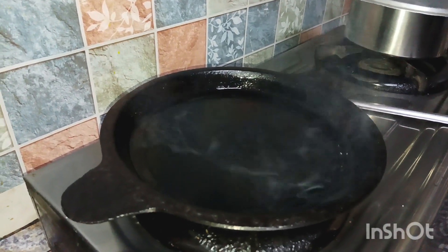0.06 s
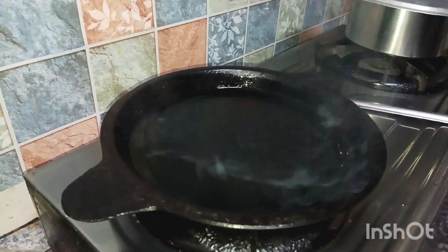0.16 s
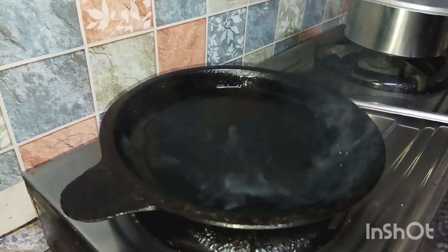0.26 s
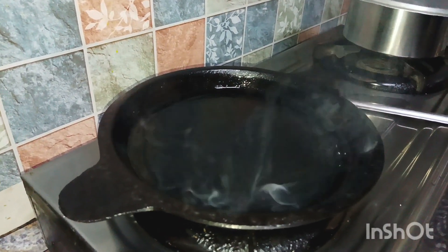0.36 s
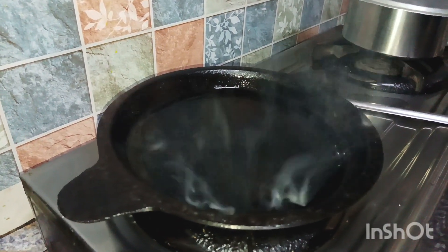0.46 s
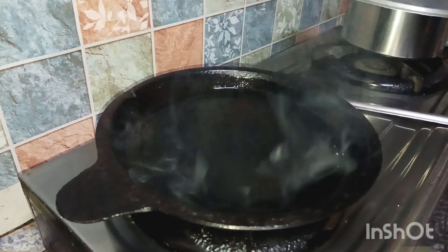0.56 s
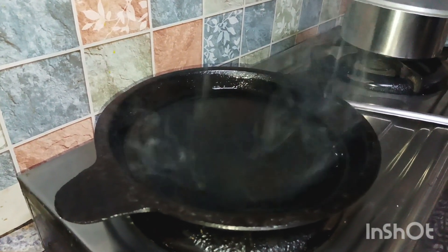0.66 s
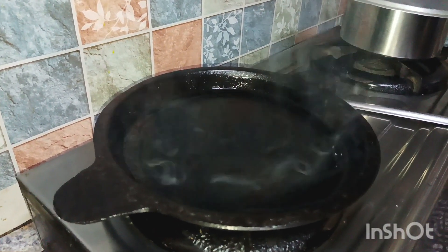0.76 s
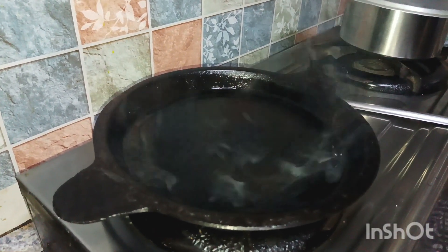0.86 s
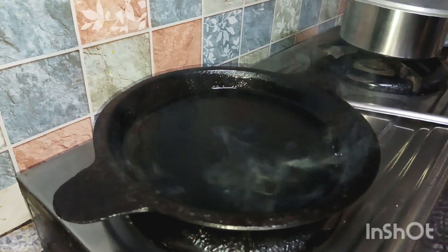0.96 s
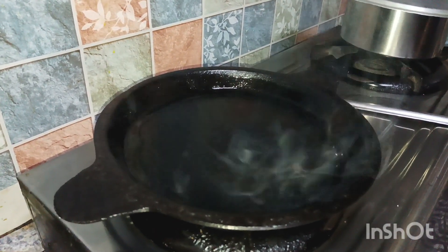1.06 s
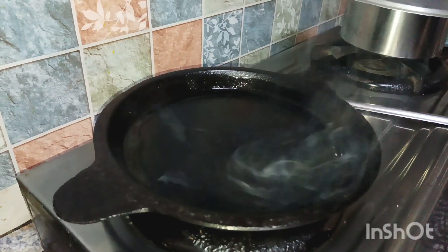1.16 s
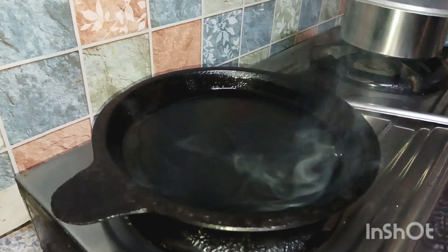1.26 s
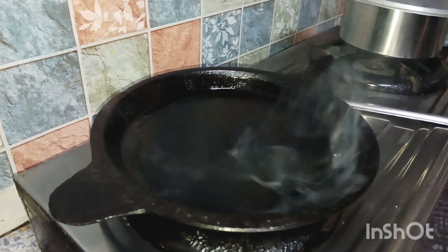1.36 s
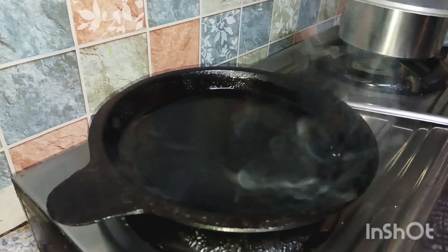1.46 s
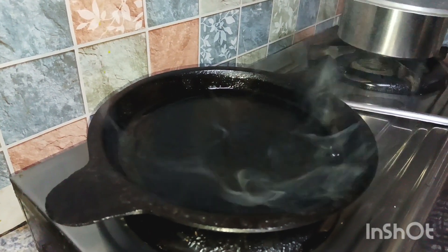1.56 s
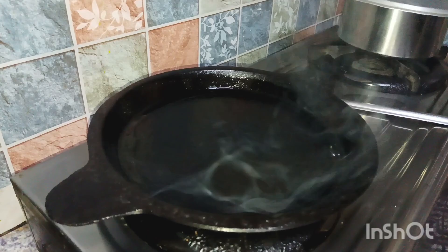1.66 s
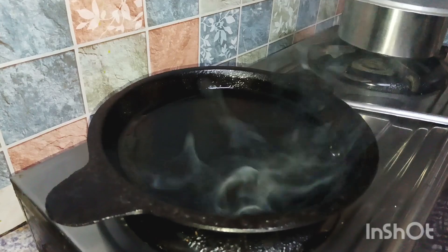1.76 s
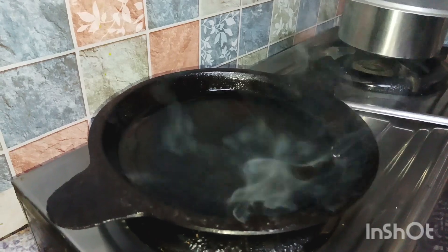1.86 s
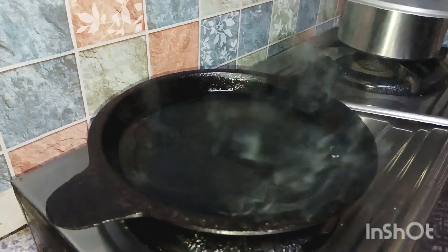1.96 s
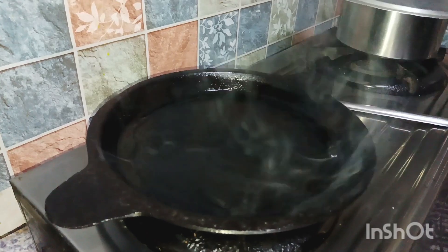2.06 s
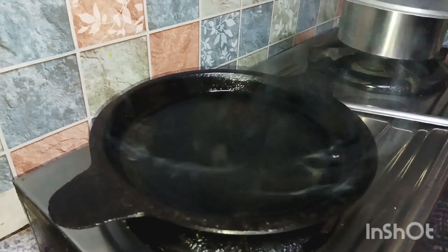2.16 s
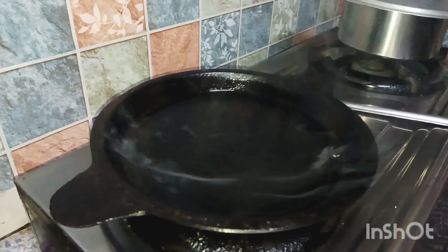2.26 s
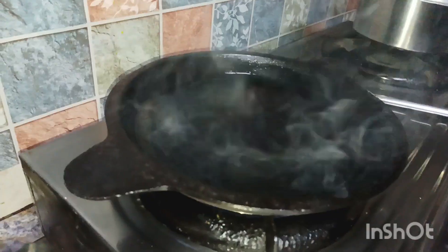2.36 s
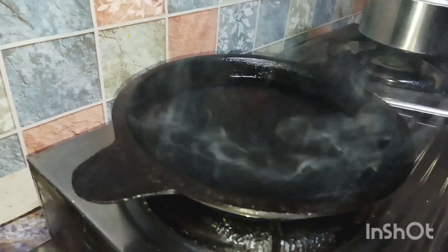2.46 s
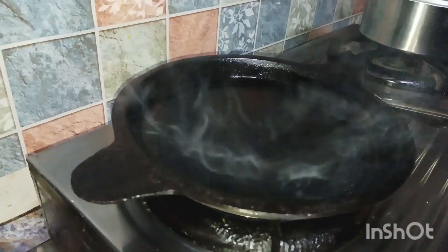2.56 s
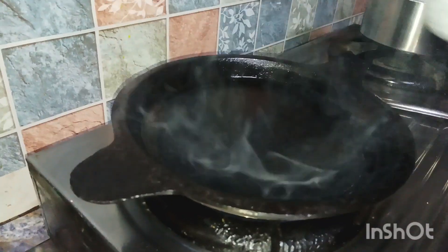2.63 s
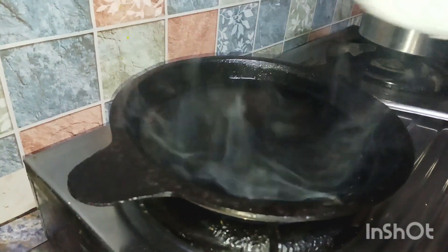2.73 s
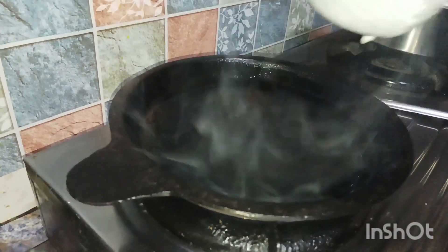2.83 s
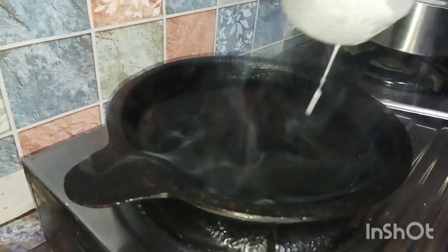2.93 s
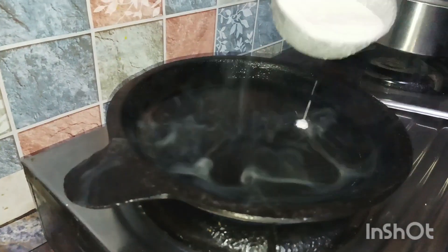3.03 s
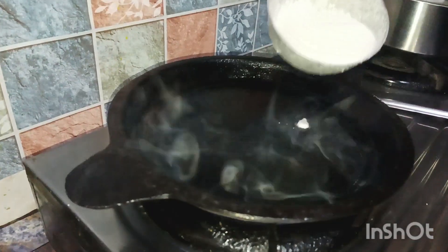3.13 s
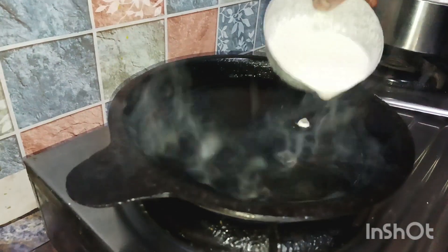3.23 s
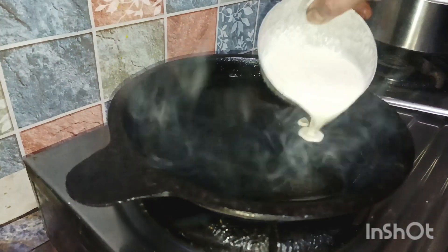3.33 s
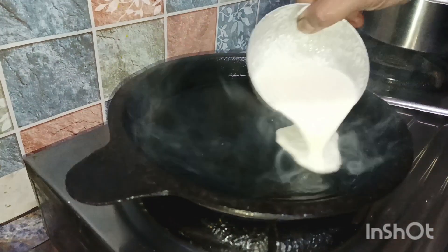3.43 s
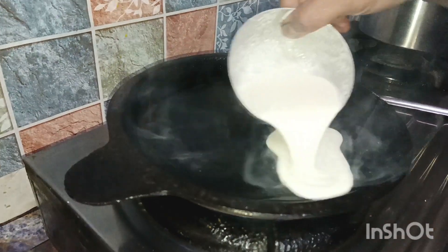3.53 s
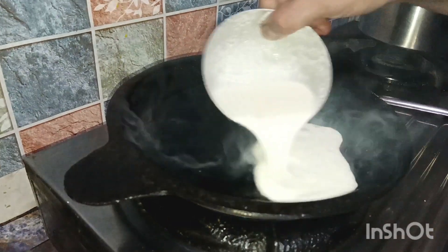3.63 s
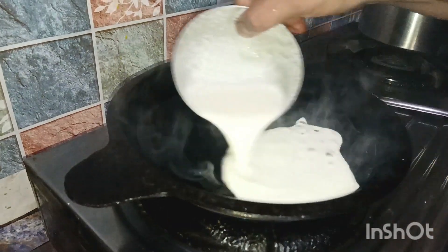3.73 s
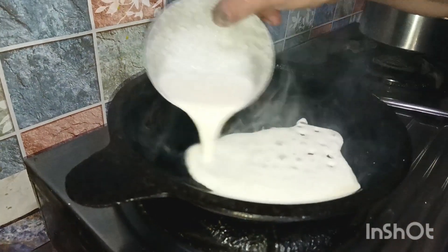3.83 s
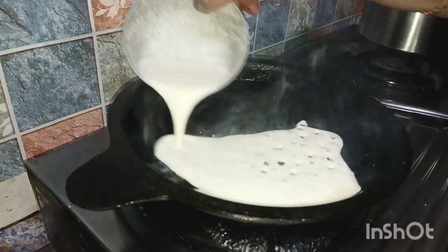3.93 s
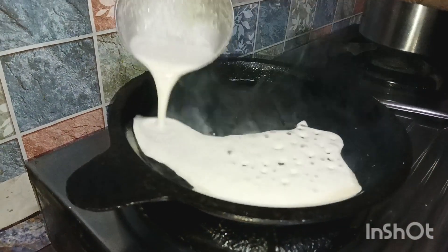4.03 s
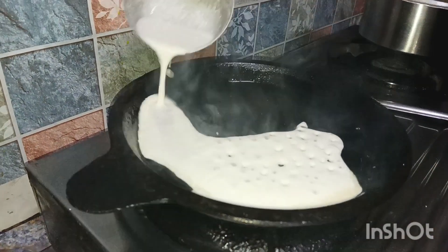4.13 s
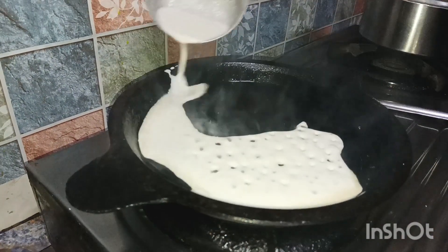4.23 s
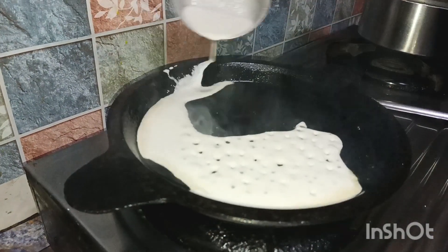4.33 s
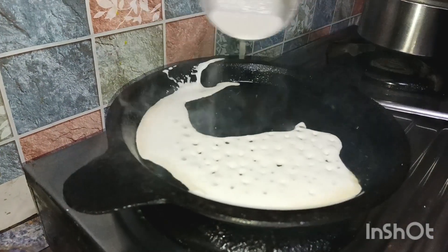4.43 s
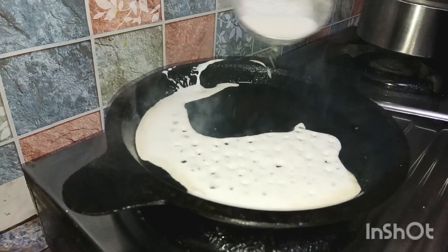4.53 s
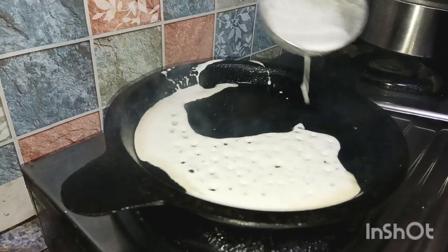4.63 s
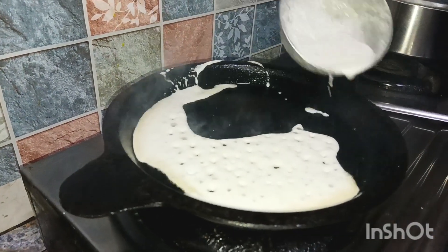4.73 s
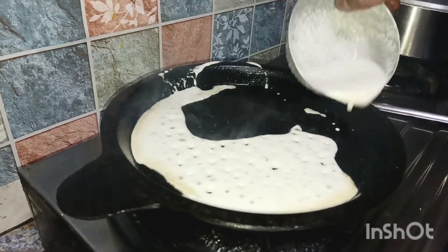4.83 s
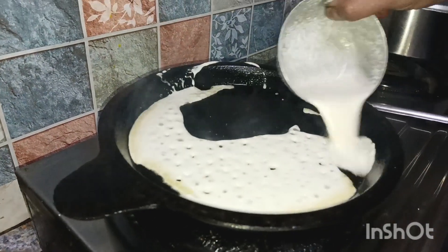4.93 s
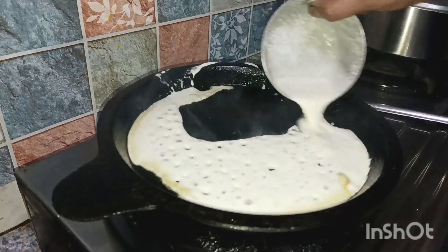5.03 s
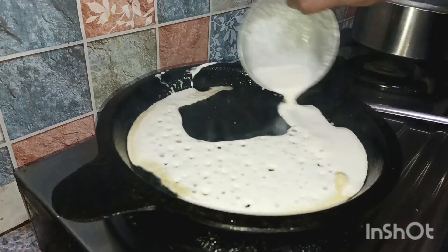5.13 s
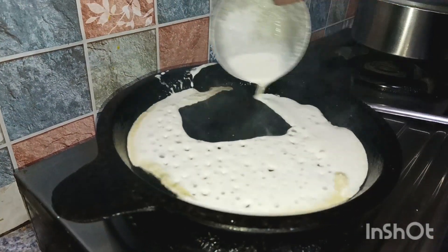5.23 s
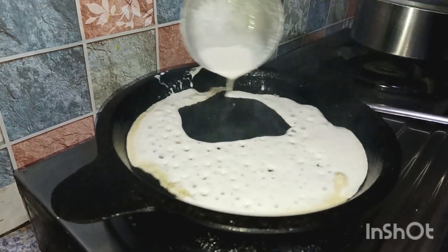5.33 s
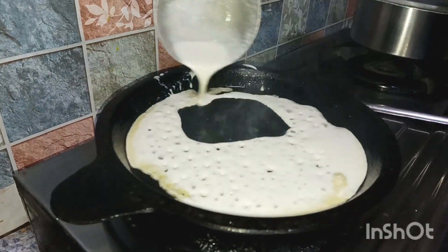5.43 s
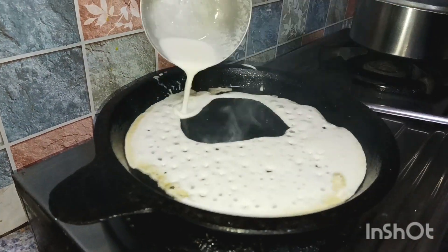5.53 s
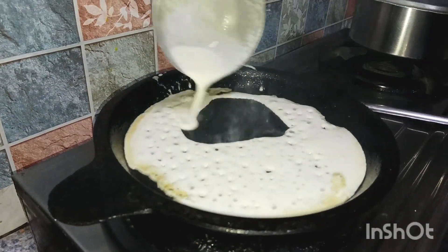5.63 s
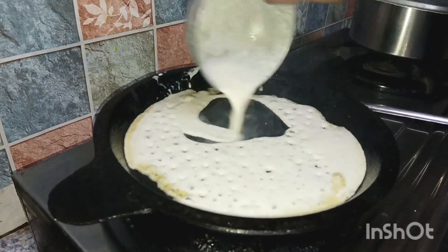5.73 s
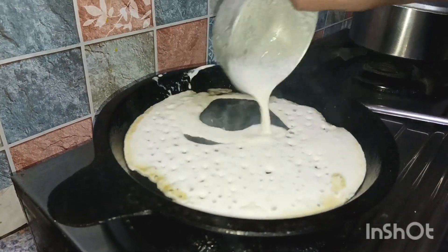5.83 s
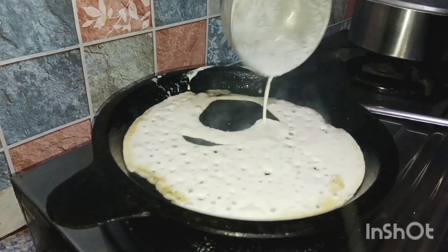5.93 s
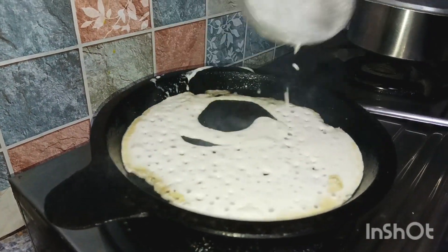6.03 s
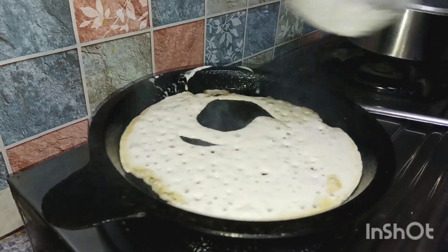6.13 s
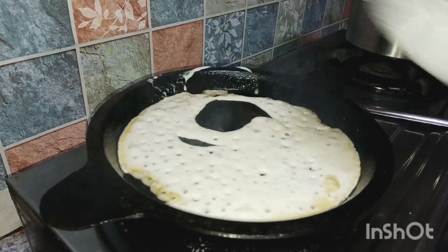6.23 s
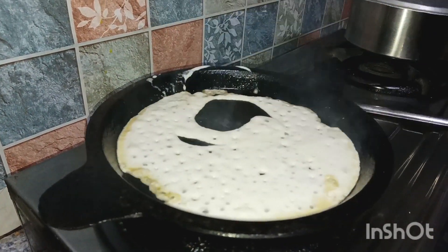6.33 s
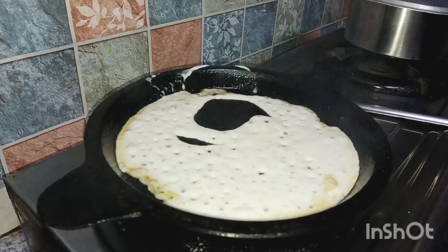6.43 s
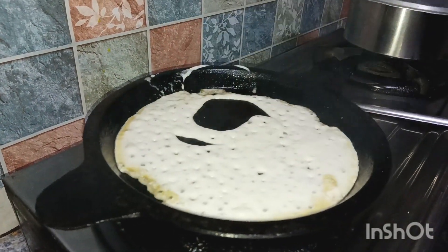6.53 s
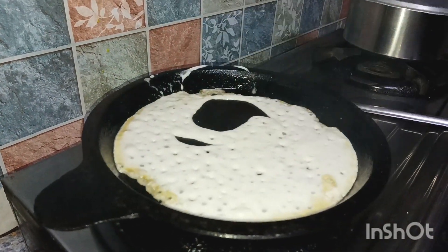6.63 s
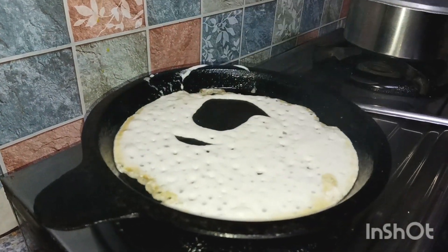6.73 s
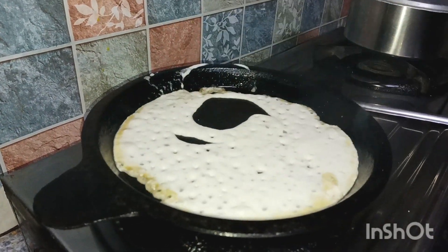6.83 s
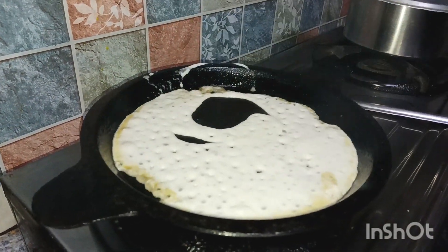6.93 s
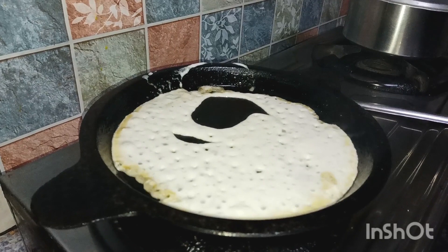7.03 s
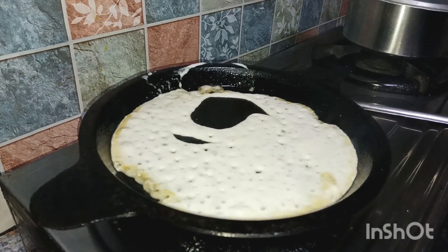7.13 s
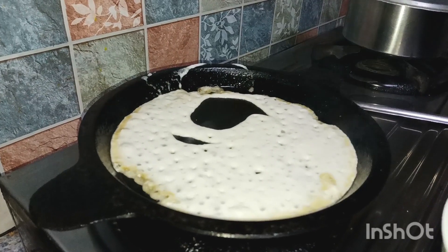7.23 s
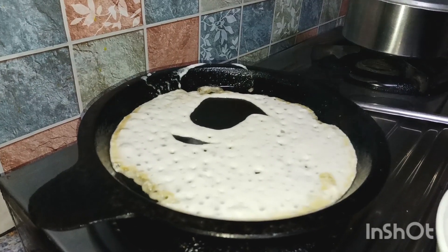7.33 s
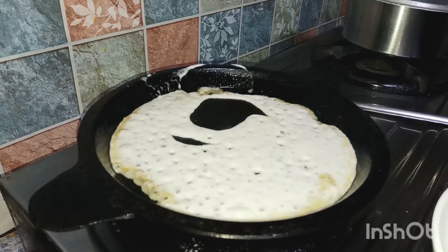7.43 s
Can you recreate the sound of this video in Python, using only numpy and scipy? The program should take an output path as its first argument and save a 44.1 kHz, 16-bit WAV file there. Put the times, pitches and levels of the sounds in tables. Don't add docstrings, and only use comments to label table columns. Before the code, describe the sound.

A kitchen extractor fan drones and a burner hisses, then batter poured onto a smoking hot iron griddle erupts into loud sizzling that gradually eases.

```python
import sys
import numpy as np
from scipy import signal
from scipy.fft import rfft, irfft, next_fast_len
from scipy.io import wavfile
from scipy.ndimage import uniform_filter1d, map_coordinates

SR = 44100
rng = np.random.default_rng(int(sys.argv[2]) if len(sys.argv) > 2 else 0)


def invert_db(level):
    return 10 ** (np.asarray(level, dtype=float) / 20)


def wav_out(sig):
    wavfile.write(sys.argv[1], SR, np.round(np.clip(np.atleast_2d(sig).T, -1, 1) * 32767).astype(np.int16))


N = 329868

# f/Hz, level/dB rms, unsteadiness/dB
FAN_TONES = [(99.1, -57.5, 3.5), (657.5, -50.5, .5)]
# t/s, level/dB rms
PANEL_BUZZ = [(0.0, -79), (0.81, -66), (1.16, -56), (1.42, -61.5), (1.73, -54), (1.91, -75), (2.19, -51.5),
              (2.27, -71), (3.73, -55.5), (3.96, -81), (4.56, -57), (4.77, -65), (6.48, -56.5),
              (6.73, -67.5), (7.44, -53), (7.48, -61)]
BUZZ_HZ = 438.3
# f/Hz, level/dB per Hz
DRONE_SPECTRUM = [(36, -80), (62, -17.5), (97, -12.5), (155, -14), (180, -1), (212, -4), (233, -9.5),
                  (259, -18), (288, -18.5), (306, -10), (326, -17.5), (371, -18.5), (401, -26),
                  (441, -18.5), (491, -28.5), (567, -20.5), (607, -32), (625, -38), (810, -38),
                  (1380, -120)]
# f/Hz, level/dB per Hz
FLAME_SPECTRUM = [(410, -34), (690, -5.5), (765, -2.5), (797, 2.5), (830, -0.5), (1010, -8), (1170, -14),
                  (1260, -13), (1350, -16), (1550, -9.5), (1650, -14.5), (1850, -7.5), (2240, -8.5),
                  (2570, -7.5), (2960, -11), (3330, -11.5), (3870, -14.5), (5030, -41), (8510, -120)]
# f/Hz, level/dB per Hz
FAT_SPECTRUM = [(2320, -9), (3950, -24), (4430, -3.5), (4810, -10), (5210, -5.5), (5650, -6), (5990, -5),
                (7210, -6), (10200, -21), (15700, -36)]
DRONE_DB, FLAME_DB, BLADE_DB, FAT_DB = -36.5, -40, -40, -54

# t/s, peak level/dB, f/Hz
FAT_TICKS = [(1.864, -60, 13000), (2.865, -41, 11500), (2.8754, -32, 11500), (2.889, -32, 10000),
             (2.9083, -31, 11500), (3.6721, -21, 12000), (3.7399, -23, 12000), (4.2595, -27, 10000),
             (5.7199, -21, 12000), (5.8671, -21, 12000), (6.2667, -21, 12000), (6.2931, -28, 9000),
             (6.3405, -30, 12000), (6.5021, -25, 12000), (6.789, -18, 12500), (6.8439, -22, 14000),
             (7.238, -28, 10000), (7.4555, -30, 9000)]
# t/s, peak level/dB, f/Hz, t60/s
STEAM_PUFFS = [(.52, -58, 13500, .03), (.8401, -41, 6430, .03), (4.3686, -17, 7000, .01),
               (4.41, -17, 7000, 0.0072), (4.4625, -26, 8100, .012), (4.78, -16, 7300, 0.049),
               (4.8843, -17, 11000, .012), (5.054, -17, 7900, 0.015), (5.183, -13, 3000, .03),
               (5.4585, -18, 11000, .015), (6.4563, -29, 7000, .008), (6.641, -26, 3200, 0.04),
               (6.907, -23, 8300, .03), (6.985, -22, 3100, 0.088), (7.0216, -23, 6500, .012),
               (7.193, -15.5, 7050, 0.019), (7.266, -19, 5800, 0.09), (.8395, -56, 11500, .01),
               (.518, -58, 10500, .02), (7.374, -21, 7000, 0.0092), (6.9835, -21, 6200, .018),
               (2.605, -40, 6900, .08), (7.188, -23.5, 3300, .04)]
# t/s, peak level/dB, f/Hz, width/octaves, t60/s
ODD_SPITS = [
    (1.7593, -19.5, 2300, 1.2, .0011),
    (5.355, -20, 1460, .2, .15),
]
# t/s, peak level/dB, f/Hz
PLOPS = [(3.995, -14, 3150), (5.175, -14, 1970), (5.6591, -13, 2140), (6.623, -9, 3860),
         (6.9812, -19, 3060)]
TICK_T60, TICK_WIDTH_HZ, PUFF_WIDTH_HZ = 0.0068, 3900, 3400
PLOP_DB, PLOP_OCTAVES, PLOP_T60 = -7, 1, 0.0067

# t/s, f/Hz, level/dB rms
LOW_SONG = [(3.14, 676.1, -51), (3.146, 676, -57), (3.17, 698, -42), (3.226, 709, -29.5), (3.26, 697, -46),
            (3.34, 685, -41), (3.356, 705, -29), (3.388, 684, -36.5), (3.52, 704, -40)]

# f/Hz, width/Hz, level/dB
DRIP_MODES = [(2100, 35, 0), (3960, 38, -4), (4330, 37, -5), (5360, 62, -7), (5850, 34, -3), (6110, 53, -1),
              (6780, 70, -2), (7320, 80, -3), (7770, 250, -3)]
# f/Hz, width/Hz, level/dB
FRESH_MODES = [(2090, 48, -2), (2570, 27, -2), (3080, 67, 0), (3570, 36, -3), (4330, 51, -5),
               (4970, 110, -6), (5750, 30, 0), (6330, 40, -4), (6620, 79, -4), (7280, 120, 0),
               (7530, 26, -1), (7960, 38, -5), (9030, 23, -5), (10300, 32, -10)]
# f/Hz, width/Hz, level/dB
POUR_MODES = [(2090, 39, 0), (2420, 29, -4), (3120, 84, 0), (3560, 180, -4), (4010, 120, -7),
              (4340, 62, -6), (4980, 140, -10), (5820, 55, -4), (6330, 36, -7), (7330, 99, -5),
              (7520, 45, -7), (8080, 40, -9), (8340, 35, -7), (9050, 38, -12)]
# f/Hz, width/Hz, level/dB
POOL_MODES = [(2090, 46, 0), (2410, 21, -4), (2570, 64, -6), (3050, 55, -2), (3590, 34, -7), (3890, 46, -8),
              (4300, 47, -1), (4980, 31, -9), (5400, 88, -10), (5970, 44, -5), (6490, 44, -8),
              (7350, 110, -5), (8090, 32, -9), (8330, 45, -9)]
# f/Hz, width/Hz, level/dB
SPREAD_MODES = [(797, 120, -9), (1680, 33, -7), (2100, 44, 0), (2400, 34, -5), (2780, 39, -4),
                (3090, 66, -3), (3560, 28, -8), (3980, 76, -10), (4300, 72, -8), (4830, 33, -11),
                (5580, 440, -10), (6300, 170, -10), (6870, 59, -11), (7350, 49, -10)]
# f/Hz, width/Hz, level/dB
FRONT_MODES = [(802, 31, -5), (1810, 28, -2), (1980, 35, 0), (2410, 30, -1), (2920, 56, 0), (3120, 36, -2),
               (3580, 34, -5), (4290, 93, -8), (5630, 38, -9), (6400, 270, -9), (6530, 26, -9),
               (6780, 40, -9)]
# f/Hz, width/Hz, level/dB
ROUND_MODES = [(797, 40, -6), (1210, 74, -6), (1390, 33, -5), (1820, 27, -3), (1980, 32, -4),
               (2770, 32, -2), (2950, 83, 0), (6450, 160, -8), (6870, 240, -8), (7380, 400, -8),
               (8240, 150, -9), (8780, 57, -12)]
# f/Hz, width/Hz, level/dB
SECOND_MODES = [(1820, 30, -5), (1990, 40, -1), (2700, 94, -1), (3090, 23, -3), (3410, 42, -5),
                (3870, 41, -5), (5070, 43, -9), (5710, 50, 0), (6130, 93, -7), (6640, 47, -5),
                (7280, 80, -3), (7550, 69, -6), (7970, 180, -6), (9030, 47, -7)]
# f/Hz, width/Hz, level/dB
RIM_MODES = [(1510, 86, -2), (1810, 35, -2), (1980, 26, -3), (2280, 65, -3), (2730, 50, 0), (2940, 52, -2),
             (3510, 84, -6), (3890, 38, -8), (5680, 240, -9), (6470, 310, -8), (7380, 210, -7),
             (8210, 37, -8)]
# f/Hz, width/Hz, level/dB
CLOSING_MODES = [(1510, 180, 0), (1980, 44, -2), (2720, 52, 0), (2960, 51, -1), (3540, 66, -4),
                 (4650, 53, -8), (5670, 230, -5), (7000, 140, -5), (7260, 140, -5), (7940, 78, -6)]
# f/Hz, width/Hz, level/dB
COVERED_MODES = [(797, 33, -5), (1620, 170, -1), (1820, 53, -2), (2280, 62, 0), (2730, 46, 0),
                 (3210, 61, -2), (6410, 260, -5), (8330, 94, -6)]
# f/Hz, width/Hz, level/dB
SET_MODES = [(797, 110, -1), (1380, 31, -1), (1820, 35, 0), (2280, 83, 0), (2580, 34, 0), (3210, 63, 0),
             (3870, 110, -2), (4840, 210, -5), (6050, 87, -3), (7330, 240, -4)]
SPOTS = [DRIP_MODES, FRESH_MODES, POUR_MODES, POOL_MODES, SPREAD_MODES, FRONT_MODES,
         ROUND_MODES, SECOND_MODES, RIM_MODES, CLOSING_MODES, COVERED_MODES, SET_MODES]
RING_DB = [3.5, 11, 10, 10.5, 9, 5, 5, 6.5, 5, 3.6, 3, 2]
MOVES_S = [2.55, 2.97, 3.1, 3.32, 3.54, 3.81, 4.2, 4.59, 4.77, 5.3, 5.85, 6.5]
MOVE_S = 0.08
SHARP_HZ, DAMPING_DB = 50, 5
FLICKER_DB = 1.2

# t/s, strength level/dB, freshness/dB (small bubbles over large)
BOIL = [(2.59, -66, -9), (2.612, -40.5, 8), (2.66, -34.5, 1.5), (2.94, -60.5, 17), (2.975, -44, 15.5),
        (3.01, -25.5, -4.5), (3.05, -26, 0), (3.12, -25.5, 0), (3.31, -25.5, -3), (3.47, -25, 1.5),
        (3.75, -24.5, -5), (4.15, -27.5, -3.5), (4.55, -29, -3.5), (4.6, -28, 0.5), (4.98, -26.5, -4),
        (5.42, -24.5, -2.5), (6.0, -30, 0), (6.9, -33.5, -0.5), (7.48, -34.5, -1.5)]
# f/Hz, level/dB per Hz
SIZZLE_SPECTRUM = [(260, -21), (450, -14.5), (597, -9), (653, -5.5), (792, -5), (1050, -3.5), (1370, 2),
                   (1720, -0.5), (2980, 1.5), (3900, -1.5), (4300, -4.5), (7480, -0.5), (9490, -6.5),
                   (15700, -10.5)]
SIZE_EDGES_HZ = [0, 1500, 5000, 9300, 30000]
SIZES_HZ = [900, 2800, 6800, 11500]
# t/s, change of level/dB, f/Hz, length/s
SURGES = [(2.714, 9.5, 900, 0.17), (3.15, 4, 2800, 0.21), (3.216, 4, 800, 0.095), (3.4, 5.5, 800, 0.35),
          (3.58, 0, 11300, 0.19), (3.593, 3.5, 2800, 0.065), (3.68, 5, 1200, 0.047), (3.853, 2.5, 2800, .1),
          (3.917, 1, 11500, 0.19), (4.03, 3, 900, 0.24), (4.722, 2.5, 2800, 0.15), (4.78, 0, 6900, 0.11),
          (4.85, -2, 6800, 0.023), (5.19, 0.5, 2800, 0.16), (5.282, -3.5, 4000, 0.07), (5.365, 2, 900, .1),
          (5.48, 3, 11500, 0.091), (5.669, 3, 900, 0.23), (5.843, 3.5, 890, 0.035), (6.26, 3, 11500, 0.047),
          (6.285, 1.5, 2800, 0.35), (6.422, -3, 2800, 0.11), (6.583, 1.5, 6800, 0.14),
          (6.66, 3.5, 2800, 0.05), (7.027, 2.5, 2800, 0.061), (7.113, -9, 1990, 0.043),
          (7.167, -2.5, 6800, 0.044), (7.21, 3, 5000, 0.04), (7.222, 12, 1300, 0.022),
          (7.266, 6, 4000, .05), (7.41, -2, 8000, 0.065), (7.458, 5.5, 6800, 0.049)]
SURGE_OCTAVES = 0.96
MEDIUM_DB = -26
BIG_DB, BIG_FOLLOWS = -34, 0.67
STEAM_DB, STEAM_FOLLOWS = -33.5, 0.59
LANDINGS_S = [2.595, 2.958]
TINY_HZ, GROWN_HZ, GROWTH_S = 6500, 404, 0.11

# t/s, middle f/Hz
SPLITS = [(.034, 5700), (1.61, 5700), (3.236, 12400), (3.236, 15100), (3.308, 7500), (3.308, 11700),
          (3.498, 6300), (3.632, 14500), (4.054, 4900), (4.054, 9600), (5.004, 4700), (5.004, 9300),
          (5.004, 14500), (5.075, 7200), (5.075, 8700), (5.075, 11000), (5.075, 15100), (5.28, 10400),
          (5.351, 9700), (5.351, 11000), (5.351, 15100), (5.955, 5800), (5.955, 7000), (5.955, 11400),
          (6.557, 13100)]
SPLIT_HZ, SPLIT_DB = 1240, -3.5


def unit(x):
    return x / np.sqrt(np.mean(x ** 2) + 1e-20)


def along(points, hz):
    f, value = np.transpose(points)
    return np.interp(np.log(hz + 1), np.log(f + 1), value)


def curves(rows):
    s, *columns = np.transpose(rows)
    t = np.arange(N) / SR
    return np.array([np.interp(t, s, column) for column in columns])


def wobble(rate):
    knots = rng.standard_normal(int(N * 40 / SR) + 8)
    return map_coordinates(knots, [np.arange(N) * min(rate, 40) / SR])


def filtered(x, response):
    size = next_fast_len(N + SR // 4)
    return irfft(rfft(x, size) * response(np.fft.rfftfreq(size, 1 / SR)), size)[..., :N]


def resonance(f, centre_hz, width_hz):
    damping = 1j * f * width_hz
    return damping / (centre_hz * centre_hz - f * f + damping)


def band(hz, low_hz, high_hz, slope):
    rise = lambda edge: 1 / (1 + ((edge + 1) / (hz + 1)) ** slope)
    return np.sqrt(np.abs(rise(low_hz) - rise(high_hz)))


def patches(x, depth_db, size, order):
    z = signal.stft(x, nperseg=size)[2]
    field = uniform_filter1d(rng.standard_normal(z.shape), size=order[0], axis=0)
    field = uniform_filter1d(field, size=order[1], axis=1)
    return signal.istft(z * invert_db(depth_db * unit(field)), nperseg=size)[1][:N]


def patchy(depth_db, grit_db, whistle_db=-1.0):
    hiss = patches(rng.standard_normal(N), depth_db, size=256, order=(5, 9))
    hiss = patches(hiss, whistle_db, size=1024, order=(2, 8))
    bursts = uniform_filter1d(rng.standard_normal(N), size=20)
    return unit(hiss * invert_db(grit_db * unit(bursts)))


def tiles(x, wet_db=-8, t60=0.5):
    t = np.arange(SR // 3) / SR
    tail = rng.standard_normal(len(t)) * invert_db(-60 * t / t60) * (t > .002)
    wet = signal.fftconvolve(x, tail / np.linalg.norm(tail))[:N]
    return (x + invert_db(wet_db) * wet) / np.hypot(1, invert_db(wet_db))


def fan():
    t, drift = np.arange(N) / SR, wobble(2.38)
    tones = np.zeros(N)
    for hz, db, sway_db in FAN_TONES:
        level = np.sqrt(2) * invert_db(db + sway_db * wobble(2.3))
        tones += level * np.sin(2 * np.pi * hz * t + 0.0012 * hz * drift)
    blade = np.sqrt(2) * invert_db(BLADE_DB + 2.3 * wobble(2.37) + 0.98 * wobble(9))
    tones += blade * np.sin(2 * np.pi * BUZZ_HZ / 2 * t + 0.37 * drift)
    buzz = np.sqrt(2) * invert_db(curves(PANEL_BUZZ)[0] + 4 * wobble(7))
    return tones + buzz * np.sin(2 * np.pi * BUZZ_HZ * t + .2 * drift)


def shaped(noise, spectrum):
    return unit(filtered(noise, lambda hz: invert_db(along(spectrum, hz))))


def kitchen():
    tones = fan()
    drone = shaped(patchy(depth_db=2.5, grit_db=-3.0), DRONE_SPECTRUM)
    flame = shaped(patchy(depth_db=1.5, grit_db=0.3), FLAME_SPECTRUM)
    fat = shaped(patchy(depth_db=2.0, grit_db=-0.5), FAT_SPECTRUM)
    air = invert_db(DRONE_DB - 5.0) * drone + invert_db(FLAME_DB) * tiles(flame)
    return tones + air + invert_db(FAT_DB + 0.13 * wobble(0.53)) * fat


def spits():
    out, t = np.zeros(N + SR), np.arange(2048) / SR
    f = np.fft.rfftfreq(len(t), 1 / SR)
    ticks = [(s, db, hz, TICK_WIDTH_HZ / hz, TICK_T60) for s, db, hz in FAT_TICKS]
    puffs = [(s, db, hz, PUFF_WIDTH_HZ / hz, t60) for s, db, hz, t60 in STEAM_PUFFS]
    plops = [(s, db + PLOP_DB, hz, PLOP_OCTAVES, PLOP_T60) for s, db, hz in PLOPS]
    for s, db, hz, octaves, t60 in ticks + puffs + list(ODD_SPITS) + plops:
        hiss = min(t60 / .006, 1) ** 2 * rng.standard_normal(len(t))
        puff = invert_db(-60 * t / max(t60, .001)) * (hiss - 1.9 * (t == 0))
        ring = resonance(f, hz, hz * max(octaves, .1)) ** 2
        ring = ring / (1 + 1j * f / (3 * hz)) ** 2
        pop = irfft(rfft(puff) * ring)
        out[round(s * SR):][:len(t)] += invert_db(db) * pop / np.abs(pop).max()
    return out[:N]


def song():
    t, (hz, db) = np.arange(N) / SR, curves(LOW_SONG)
    start, end = LOW_SONG[0][0], LOW_SONG[-1][0]
    on = np.interp(t, [start - .03, start, end, end + 0.026], [0, 1, 1, 0])
    level = np.sqrt(2) * on * invert_db(db + 1.1 * wobble(30.5))
    return level * np.sin(2 * np.pi * np.cumsum(hz) / SR + 0.33 * wobble(28))


def ring_response(modes, top_db, f):
    total = 0
    for centre, width, db in modes:
        damping_db = DAMPING_DB * max(np.log2(width / SHARP_HZ), 0)
        gain = invert_db(db + top_db - along(SIZZLE_SPECTRUM, centre) - damping_db)
        total = total + gain * resonance(f, centre, width)
    return total


def iron(x):
    t = np.arange(N) / SR
    moved = [np.clip((t - s) / MOVE_S + .5, 0, 1) for s in [*MOVES_S, SR]]
    modes = np.zeros(N)
    for come, left, spot, top_db in zip(moved, moved[1:], SPOTS, RING_DB):
        force = np.sqrt(np.abs(come - left)) * x
        modes += filtered(force, lambda f: ring_response(spot, top_db, f))
    flicker = patches(modes, FLICKER_DB, size=512, order=(3, 8))
    return flicker * np.std(modes) / np.std(flicker)


def sizes_db():
    t = np.arange(N) / SR
    strength_db, fresh_db = curves(BOIL)
    fizz_db = strength_db + fresh_db
    big_db = BIG_DB + BIG_FOLLOWS * (strength_db - MEDIUM_DB)
    steam_db = STEAM_DB + STEAM_FOLLOWS * (fizz_db - MEDIUM_DB)
    level_db = np.array([big_db, strength_db, fizz_db, steam_db])
    for s, db, hz, length in SURGES:
        reach = np.exp(-(np.log2(np.divide(SIZES_HZ, hz)) / SURGE_OCTAVES) ** 2)
        swell = np.cos(np.pi * np.clip((t - s) / length / 2, -.5, .5)) ** 2
        level_db += db * np.outer(reach, swell)
    return level_db - 80 * (t < BOIL[0][0])


def grow(boil):
    hz, t, z = signal.stft(boil, SR, nperseg=512)
    age = np.min([np.where(t < s, np.inf, t - s) for s in LANDINGS_S], axis=0)
    lowest_hz = GROWN_HZ + (TINY_HZ - GROWN_HZ) * np.exp(-age / GROWTH_S)
    return signal.istft(z * band(hz[:, None], lowest_hz, SR, slope=2.6), SR, nperseg=512)[1][:N]


def bubbles():
    level_db = sizes_db()
    surge_db = 0.35 * wobble(26)
    grit = np.array([patchy(depth_db=0.0, grit_db=1.0, whistle_db=3.0),
                     patchy(depth_db=1.0, grit_db=0.0, whistle_db=1.36),
                     patchy(depth_db=1.5, grit_db=2.5, whistle_db=1.9),
                     patchy(depth_db=1.1, grit_db=2.6, whistle_db=.5)])

    def size_spectra(hz):
        limits = zip(SIZE_EDGES_HZ, SIZE_EDGES_HZ[1:])
        share = np.array([band(hz, low, high, slope=5.44) for low, high in limits])
        return invert_db(along(SIZZLE_SPECTRUM, hz)) * share

    layers = filtered(grit, size_spectra)
    return grow(sum(invert_db(db + surge_db) * unit(layer) for db, layer in zip(level_db, layers)))


def scene():
    boil, pops = bubbles(), spits()
    griddle = invert_db(-1.9) * (boil + iron(boil + pops)) + pops + song()
    mono = tiles(griddle, wet_db=-17, t60=.25) + kitchen()
    return np.array([mono, mono])


def low_pass(x):
    return signal.sosfilt(signal.butter(12, 15890, fs=SR, output="sos"), x)


def record(dry):
    side, frame = np.zeros(N + SR), 2048
    window = signal.windows.kaiser_bessel_derived(frame, 4 * np.pi)
    f = np.fft.rfftfreq(frame, 1 / SR)
    for s, hz in SPLITS:
        start = round(s * SR) - frame // 2
        fill = band(f, hz - SPLIT_HZ / 2, hz + SPLIT_HZ / 2, slope=230)
        there = np.std(irfft(rfft(dry[0, start:start + frame]) * fill))
        noise = unit(irfft(rfft(rng.standard_normal(frame)) * fill))
        side[start:start + frame] += invert_db(SPLIT_DB) * there * noise * window
    mix = dry + side[:N] * np.array([[1], [-1]])
    return low_pass(mix)


dry = scene()
out = record(dry)
wav_out(out)
```